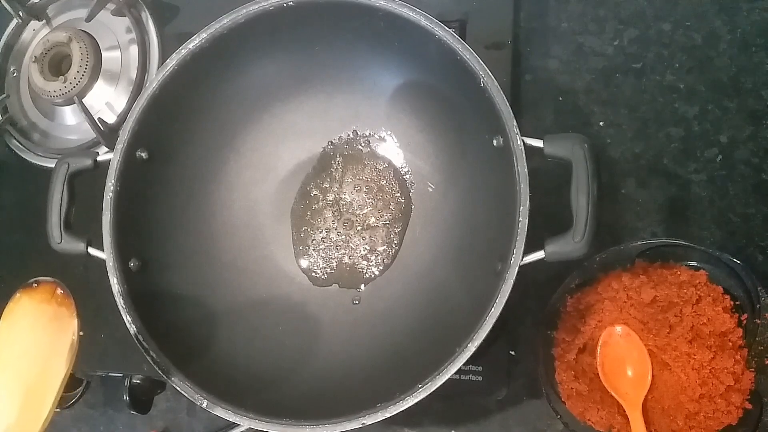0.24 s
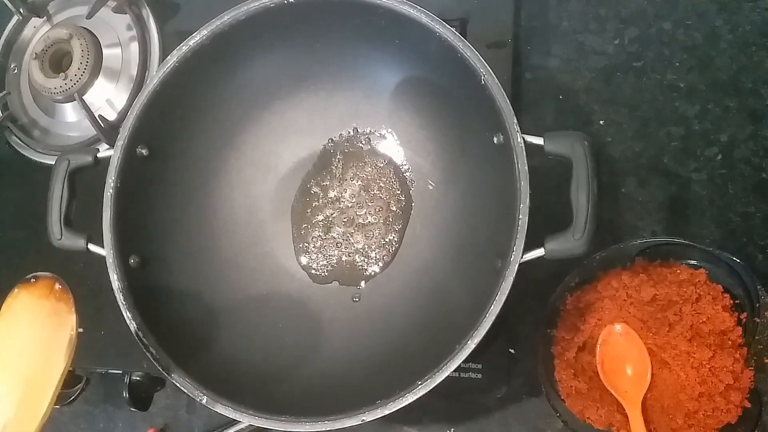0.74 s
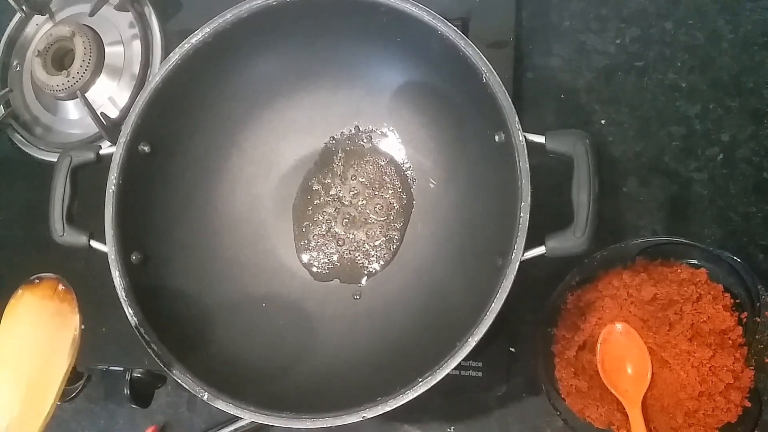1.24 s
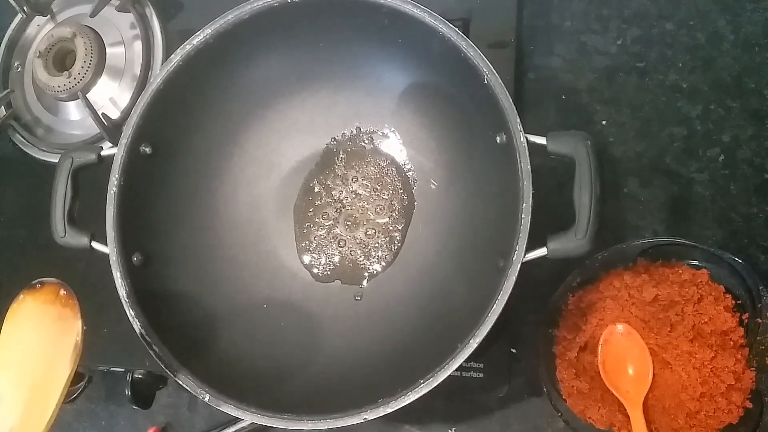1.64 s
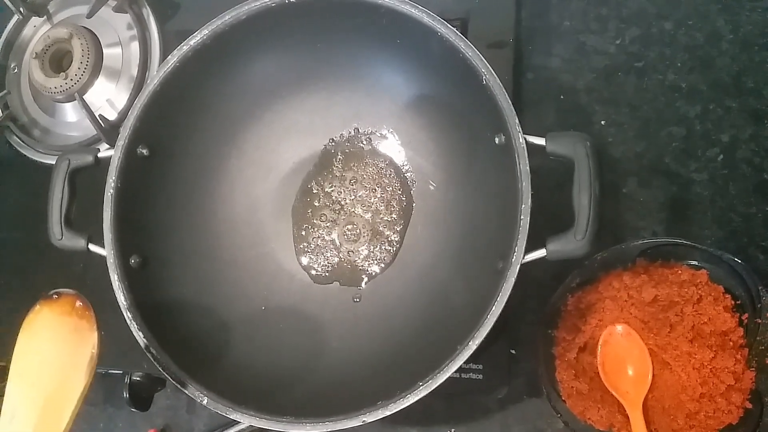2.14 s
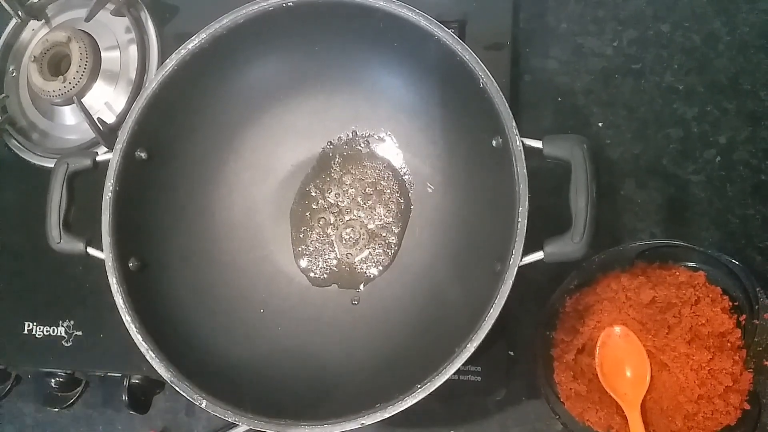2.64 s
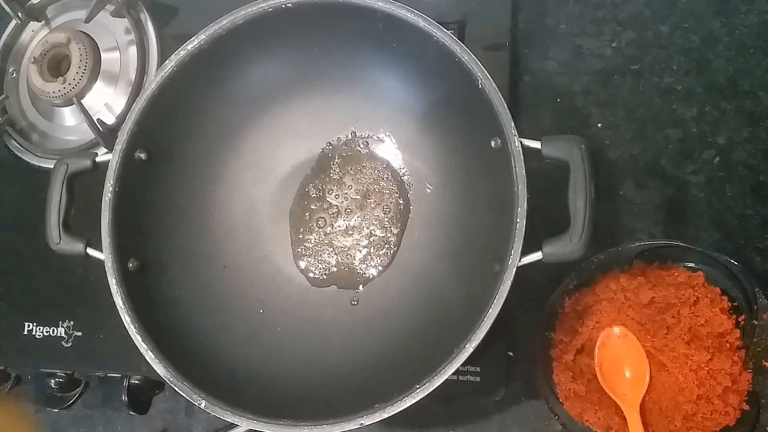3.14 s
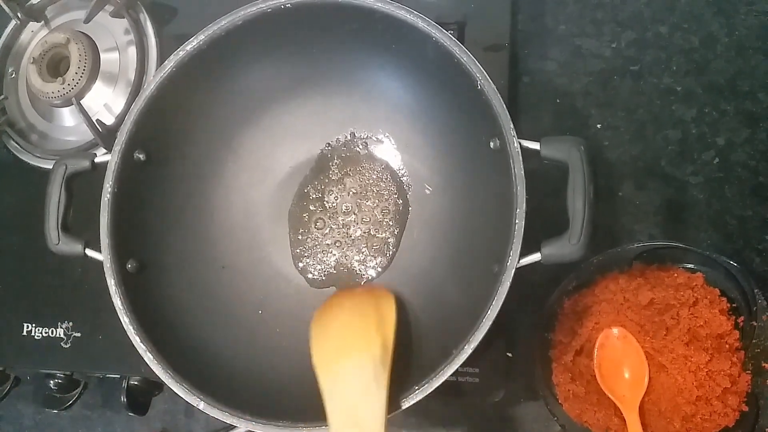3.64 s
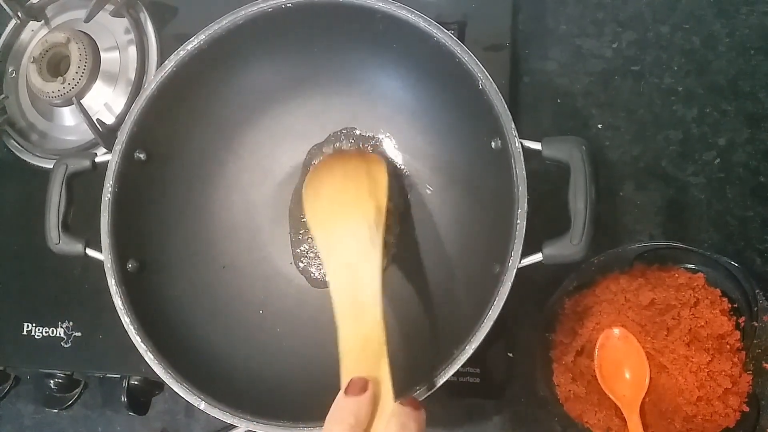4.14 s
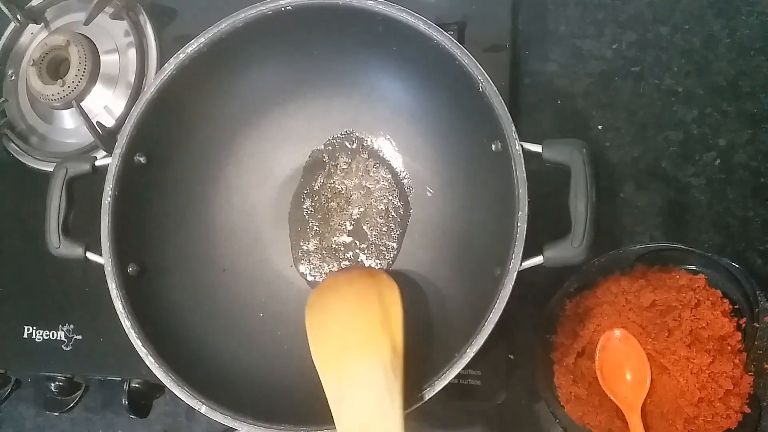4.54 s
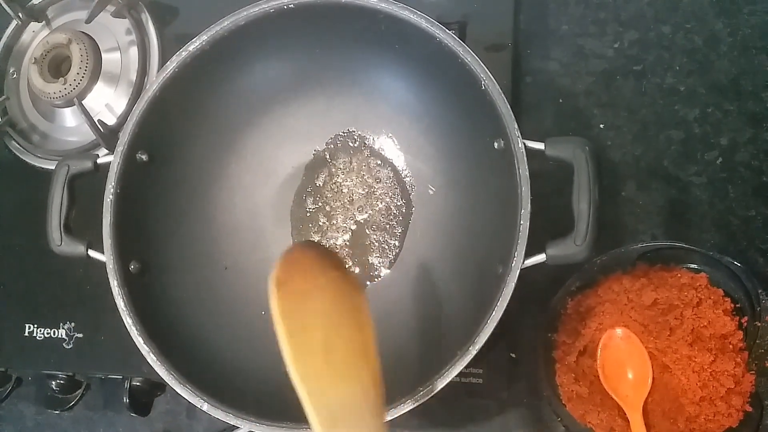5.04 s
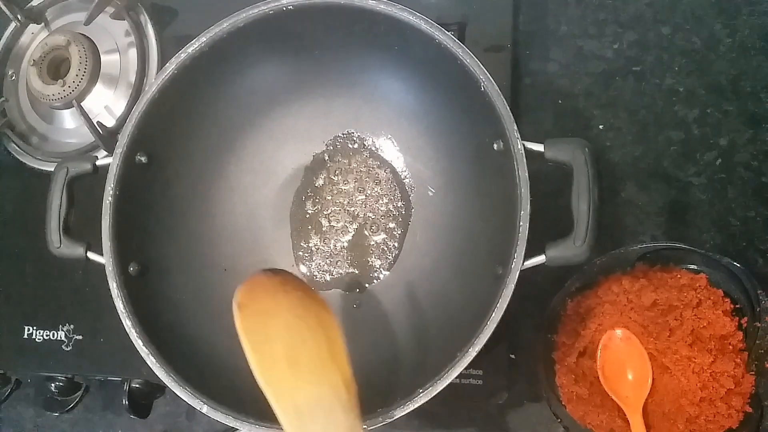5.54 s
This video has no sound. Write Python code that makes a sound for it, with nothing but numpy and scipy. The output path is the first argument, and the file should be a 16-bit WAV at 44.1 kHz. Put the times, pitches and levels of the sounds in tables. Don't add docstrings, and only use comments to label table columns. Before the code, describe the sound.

Seeds pop and crackle sharply in hot oil in a steel pan, over faint hiss and low fan hum, with a wooden spatula knocking once.

```python
import sys
import numpy as np
from scipy import signal
from scipy.fft import rfft, irfft
from scipy.io import wavfile
from scipy.ndimage import uniform_filter1d

SR = 44100
rng = np.random.default_rng(int(sys.argv[2]) if len(sys.argv) > 2 else 0)


def makeup_ratio(level_db):
    decades = np.asarray(level_db, float) / 20
    return 10 ** decades


def inscribe(sig):
    pcm = np.round(np.clip(np.atleast_2d(sig).T, -1, 1) * 32767)
    wavfile.write(sys.argv[1], SR, pcm.astype(np.int16))


N = 255339
SECONDS = np.arange(N) / SR

BURST_EDGES_HZ = [1500, 2600, 5600, 10500, 15700]


def level(x, db):
    return x * makeup_ratio(db) / np.sqrt(np.mean(x ** 2))


def unit_energy(response):
    return response / np.sqrt(np.mean(np.sum(response ** 2, axis=-1)))


def curve(table):
    s, *columns = np.transpose(table)
    return [np.interp(SECONDS, s, column) for column in columns]


def band(x, lo_hz, hi_hz):
    sos = signal.butter(2, [lo_hz, min(hi_hz, 20000)], "bandpass", fs=SR, output="sos")
    return signal.sosfilt(sos, x)


def band_both_ways(x, lo_hz, hi_hz):
    backwards = band(x, lo_hz, hi_hz)[:, ::-1]
    return band(backwards, lo_hz, hi_hz)[:, ::-1]


def top_cut(x):
    return signal.sosfilt(signal.ellip(10, .2, 80, 15850, fs=SR, output="sos"), x)


def convolve(x, response):
    return signal.fftconvolve(x, response, axes=-1)[..., :N]


def decay(t60, length_s):
    return np.exp(-np.log(1000) * np.arange(int(length_s * SR)) / SR / t60)


def room_tail(shape, t60, build_s):
    noise = rng.standard_normal((*shape, SR // 2))
    build_up = np.minimum(np.arange(SR // 2) / SR / build_s, 1)
    return noise * decay(t60, .5) * build_up


def ring(modes):
    t = np.arange(SR // 2) / SR
    out = 0
    for hz, db, t60 in modes:
        phase_turns = 0.3 * rng.random((2, 1)) + np.array([[0], [.15]])
        tone = np.sin(2 * np.pi * (hz * t + phase_turns))
        out = out + makeup_ratio(db) * decay(min(t60, .4), .5) * tone
    return unit_energy(out)


def walk(rate):
    hold = int(SR / rate)
    steps = np.repeat(rng.standard_normal(N // hold + 1), hold)
    return 1.4 * uniform_filter1d(uniform_filter1d(steps, hold), hold)[:N]


def swell(middle_s, length_s):
    return np.exp(-(2 * (SECONDS - middle_s) / length_s) ** 2)


def coloured(spectrum):
    # pitch_hz, correlation (0-1)
    likeness = [(30, 1), (120, 0.88), (300, 0.71), (1000, 0.08), (16000, 0)]
    log_hz = np.log(np.arange(1, N // 2 + 2) * SR / N)

    def across_pitch(table):
        hz, value = np.transpose(table)
        return np.interp(log_hz, np.log(hz), value)

    like = np.clip(across_pitch(likeness), 0, 1)
    mid, side = rfft(rng.standard_normal((2, N))) * makeup_ratio(across_pitch(spectrum))
    mid = mid * np.sqrt(1 + like)
    side = side * np.sqrt(1 - like)
    return irfft(np.array([mid + side, mid - side]), N)


def murmur():
    # middle_s, length_s, pitch_hz, level_db
    duct_tones = [(.1, 0.2, 290, -60), (0.394, .3, 295, -62), (.4, .3, 325, -65), (.15, .3, 370, -63),
                  (1.024, .12, 270, -61), (1.174, .2, 250, -63.5), (1.45, 0.37, 295, -64),
                  (1.5, 0.35, 208, -64), (2.1, 0.38, 300, -63), (2.2, 0.69, 245, -62),
                  (2.743, 0.21, 290, -62), (3.094, 0.17, 300, -66), (3.74, 0.14, 250, -55),
                  (4.1, .25, 290, -59), (4.505, .15, 290, -54.5), (4.78, 0.16, 250, -57),
                  (5.2, .5, 297, -58.5), (5.73, 0.12, 250, -58), (3.75, .15, 78, -53), (5.1, 1, 80, -57)]
    wander_hz = 6
    drift = wander_hz * np.cumsum(walk(15)) / SR
    flutter = makeup_ratio(2.9 * walk(20))
    out = 0
    for s, length_s, hz, db in duct_tones:
        tone = np.sin(2 * np.pi * (hz * SECONDS + drift))
        out = out + makeup_ratio(db) * swell(s, length_s) * tone
    return out * flutter * makeup_ratio(np.array([[1.5], [-1.5]]))


def fan():
    # middle_s, level_db, length_s
    throbs = [(0.12, -61, 0.13), (0.565, -61, 0.33), (1, -52.5, 0.19), (1.203, -51.5, 0.13),
              (1.386, -48.5, 0.045), (1.632, -52, 0.37), (2.05, -51.5, 0.17), (2.32, -52, 0.086),
              (2.658, -43.5, 0.062), (3.024, -66, 0.32), (3.273, -51, .04), (3.43, -51, 0.15),
              (3.71, -54, 0.17), (3.925, -52, 0.11), (4.084, -46, 0.078), (4.246, -48.5, 0.051),
              (4.363, -57, 0.058), (4.57, -46.5, 0.19), (4.783, -44.5, 0.18), (4.963, -42.5, 0.071),
              (5.096, -42.5, 0.064), (5.265, -41.5, 0.15), (5.436, -41, 0.16), (5.604, -41.5, 0.047),
              (5.705, -40, 0.062)]
    # time_s, pitch_hz
    hum_pitch = [(0, 128), (1.25, 125), (1.5, 111), (2.1, 113.3), (2.4, 123.6), (4.4, 121.1), (5.79, 123.2)]
    steady_db, wander_hz = -62.5, 6
    size = makeup_ratio(steady_db) + sum(makeup_ratio(db) * swell(s, length_s) for s, db, length_s in throbs)
    turns = np.cumsum(curve(hum_pitch)[0] + wander_hz * walk(12)) / SR
    flutter = makeup_ratio(1.0 + 1.95 * walk(25.17))
    sway = makeup_ratio(np.array([[1], [-1]]) * 1.13 * walk(9.1))
    return np.sin(2 * np.pi * turns) * size * flutter * sway


def kitchen():
    # time_s, draught_db, sizzle_db
    air = [(0.0, -63, -56.5), (0.61, -66, -62), (1.0, -66, -57), (1.79, -67, -61), (2.11, -62.5, -59),
           (3.03, -67, -58.5), (3.05, -64.5, -58), (3.66, -66.5, -57.5), (3.76, -52, -55),
           (3.87, -68, -46.5), (3.95, -65.5, -56.5), (5.01, -56.5, -56.5), (5.51, -63.5, -58.5),
           (5.79, -56, -52)]
    # pitch_hz, density_db (dB per Hz)
    rumble_spectrum = [(12, -22), (20, -9), (43, -15), (96, -1.5), (123, -3), (140, -1), (182, -7.5),
                       (279, -6.5), (387, -9.5), (456, -14), (592, -16.5), (1000, -34), (1300, -74),
                       (2200, -120)]
    # pitch_hz, density_db (dB per Hz)
    hiss_spectrum = [(290, -17), (500, -11.5), (596, -3), (1200, -7), (1700, -4.5), (2160, -5.5),
                     (2940, -10.5), (6660, -15), (8300, -12.5), (15100, -12.5), (15800, -22), (16500, -53)]
    rumble_db, follow_share = -58, 0.58
    draught_db, hiss_db = curve(air)
    rumble = level(coloured(rumble_spectrum), 0)
    deep = signal.sosfilt(signal.butter(4, 110, fs=SR, output="sos"), rumble)
    upper_db = rumble_db + follow_share * (draught_db - draught_db.mean())
    hiss = level(coloured(hiss_spectrum), 2.7) * makeup_ratio(.5 * walk(19) + .5 * walk(400))
    draught = makeup_ratio(draught_db - 6.0) * deep + makeup_ratio(upper_db + 2.5) * (rumble - deep)
    return fan() + draught + makeup_ratio(hiss_db) * hiss


def steam():
    # loudest_s, fade_s, level_db, centre_hz, width_hz
    jets = [(.113, 0.017, -43.5, 4020, 3600), (0.691, 0.029, -40, 4200, 5000),
            (1.1262, .003, -23, 4200, 3200), (1.4772, 0.004, -30, 4950, 2380),
            (4.7535, .003, -31, 5200, 1800), (2.592, .02, -41, 4500, 4400),
            (5.0797, .0012, -24, 12500, 5000), (4.1095, 0.005, -31, 11000, 1600),
            (4.5, 0.007, -33, 4050, 4020), (2.286, 0.004, -36, 8230, 2700), (1.705, .012, -50, 11000, 8000),
            (3.16, .005, -35, 9200, 2400), (2.62, 0.012, -38.5, 5840, 6000),
            (3.03, 0.021, -35, 11800, 6000), (3.487, .001, -50, 14000, 3000),
            (4.1095, 0.005, -35, 5800, 800), (4.2, 0.0031, -54, 11900, 1500),
            (4.262, .003, -49, 13500, 3000), (5.127, .003, -38, 12500, 2400),
            (5.145, .004, -37.5, 12700, 3600), (5.271, .004, -47, 11800, 3000),
            (5.728, 0.013, -40, 4630, 530), (5.752, 0.0043, -46.5, 8000, 2000)]
    swell_share = 0.36
    out = np.zeros((2, N))
    noise = rng.standard_normal((2, N)) * makeup_ratio(np.array([[3.0], [-3.0]]))
    for s, fade_s, db, hz, width in jets:
        near = slice(max(int(s * SR) - SR // 8, 0), int(s * SR) + SR // 4)
        t = SECONDS[near]
        shape = np.exp(-np.abs(t - s) / np.where(t < s, swell_share * fade_s, fade_s))
        jet = level(band(noise[:, near], hz - width / 2, hz + width / 2), 0)
        out[:, near] += makeup_ratio(db) * shape * jet
    return top_cut(out)


def spatula():
    # start_s, hold_s, rub_db, squeak_db, rasp_db
    strokes = [(1.962, 0.013, -62.5, -46, -57), (2.045, .08, -63, -62, -53.5), (3.69, 0.012, -46, -29, -45),
               (3.735, 0.1, -48, -46, -55.5), (3.763, 0.0071, -72, -39, -59),
               (3.791, 0.0054, -70, -27.5, -57), (3.799, .004, -60, -37, -57), (3.833, .012, -67, -31, -67),
               (3.858, .007, -65, -30.5, -64), (3.87, 0.013, -49, -37, -54), (4.351, 0.0084, -42, -40, -38),
               (5.156, .015, -60, -61, -61.5), (5.25, 0.13, -66, -70, -55.5)]
    # pitch_hz, half_width_hz, level_db
    wood_bands = [(588, 60, 8), (878, 127, 9), (1690, 105, -2.5), (440, 210, 9)]
    # start_s, level_db
    knock_times = [
        (3.686, -17.5),
        (4.352, -34.5),
        (3.738, -33),
        (3.808, -34),
    ]
    # pitch_hz, level_db, t60_s
    knock_modes = [(560, -6, .025), (690, 0, .025), (1650, 2, .03), (1810, 2, .025), (2130, -2, .05),
                   (2600, -4, .025), (3350, -3, .03)]
    # time_s, pitch_hz
    squeak_pitch = [(0, 2130), (3.76, 2100), (3.8, 2130), (3.86, 2220), (3.92, 2190), (4.3, 2130)]
    press_db_per_s, lift_db_per_s = 2000, 341
    wander_hz, squeak_fade = 70, 2.2

    grit = rng.standard_normal((2, N)) * makeup_ratio(0.56 * walk(300) + 3.5 * walk(60))
    grit[1] = 0.66 * grit[0] + 0.79 * grit[1]
    wood = sum(makeup_ratio(db) * band(grit, hz - width, hz + width) for hz, width, db in wood_bands)
    wood = level(wood, 0)
    turns = np.cumsum(curve(squeak_pitch)[0] + wander_hz * walk(150)) / SR
    tone = np.sin(2 * np.pi * (turns + np.array([[0], [.2]]))) * makeup_ratio(3.5 * walk(200))
    squeak = level(tone, 0) + 0.6 * level(band(grit, 1950, 2600), 0)
    rasp = level(band(grit, 1020, 4900), 0)

    out = np.zeros((2, N))
    for s, hold_s, rub_db, squeak_db, rasp_db in strokes:
        press_db = press_db_per_s * (SECONDS - s)
        lift_db = lift_db_per_s * (s + hold_s - SECONDS)
        touch = makeup_ratio(np.minimum(np.minimum(press_db, lift_db), 0))
        out += touch * makeup_ratio(rub_db + 0.5) * wood
        out += touch ** squeak_fade * makeup_ratio(squeak_db - 10.0) * squeak
        out += touch * makeup_ratio(rasp_db + 1.5) * rasp
    knocks = np.zeros((1, N))
    for s, db in knock_times:
        knocks[0, int(s * SR)] = makeup_ratio(db + 17.0)
    return out + band(convolve(knocks, ring(knock_modes)), 270, 3390)


def slaps():
    # start_s, energy_db
    slap_times = [(0.075, -23.5), (0.4712, -33.5), (0.6782, -15), (0.9054, -35), (0.9462, -27),
                  (0.9636, -20), (1.1249, -22), (1.4763, -34), (1.7348, -32.5), (1.9603, -30.5),
                  (2.3652, -26), (2.5773, -19), (2.6383, -30), (2.7045, -21.5), (3.035, -20), (3.295, -33),
                  (3.3966, -35), (3.5774, -22), (3.7147, -18.5), (4.1087, -31.5), (4.3122, -32),
                  (4.3568, -23), (4.4947, -22), (4.7533, -31), (4.764, -25), (4.8344, -19.5),
                  (5.0801, -25.5), (5.7273, -36)]
    slap_hz, lean_db = (486, 1640), 5
    room_db, room_t60_s = -3, .4
    lag = 6
    out = np.zeros((2, N))
    s, db = np.transpose(slap_times)
    for side, sign in enumerate((.5, -.5)):
        out[side, (s * SR - sign * lag).astype(int)] = -makeup_ratio(db + sign * lean_db + 15)
    out = band_both_ways(out, *slap_hz)
    room = unit_energy(room_tail((2,), room_t60_s, 0.0059))
    return out + convolve(out, makeup_ratio(room_db) * room)


def steel():
    # pitch_hz, level_db, t60_s
    families = [
        [(2116, -4, .25), (2142, -2, .22), (2130, 3, .07), (2190, -4, .12), (2225, -7, .1), (2570, -6, .08)],
        [(3145, 0, .4), (3163, -3, .3), (3300, -1, .2), (3360, -3, .1)],
        [(4058, -3, .2), (4160, -4, .12), (4290, -2, .16), (4335, -1, .16), (4470, -4, .1), (4640, -5, .1),
         (4780, -4, .1)],
    ]
    # start_s, peak_db, then low_db, middle_db, high_db against the peak
    strikes = [(0.1116, -35, -28, -20, -10), (0.6769, -22, -30.5, -23, -21), (0.9038, -47, -17, -29, -7),
               (0.9448, -33.5, -22.5, -26.5, -11), (0.9622, -28, -22.5, -13, -11),
               (1.1233, -26, -20.5, -21, -30), (1.4755, -32.5, -24, -31, -17),
               (2.7037, -27.5, -30, -18, -20), (3.2939, -35, -28, -12, -13),
               (3.4266, -33, -27.5, -30, -11.5), (3.7135, -36, -20, -26, -15),
               (3.7913, -30.5, -20, -10, -30), (4.354, -26, -22, -30, -31),
               (4.4932, -24, -22.5, -10.5, -12), (4.7516, -32, -25, -31, -4),
               (4.7626, -25, -26.5, -32, -10), (5.0055, -37, -30, -15, -12),
               (5.7264, -37.5, -25.5, -21, -21)]
    radiation_db = [39, 20, 26]
    s, peak_db, *family_db = np.transpose(strikes)
    out = 0
    for db, modes, ready_db in zip(family_db, families, radiation_db):
        hits = np.zeros((1, N))
        hits[0, (s * SR).astype(int)] = makeup_ratio(peak_db + db + ready_db)
        out = out + convolve(hits, ring(modes))
    return out


def bursts():
    # start_s, snap_db, spit_db, fizz_db
    pops = [(0.0748, -15.5, -8, -1), (0.678, -4.5, -1, 2), (0.905, -21, -16.5, -17),
            (0.9466, -11, -12, -15), (0.9633, -9.5, -6.5, -2.5), (1.1253, -3, -14, -9),
            (1.4759, -9.5, -38, -36), (1.7344, -22, -22, -17), (1.9603, -14, -13, -7.5),
            (2.0153, -31, -16.5, -10), (2.2842, -30, -19, -22.5), (2.365, -14, -16, -4),
            (2.5776, -8.5, -1, 2), (2.6381, -12.5, -11, -23), (2.704, -7, -5, -1),
            (3.035, -13, -11.5, -3.5), (3.1354, -19.5, -14.5, -23), (3.2947, -16, -25, -24),
            (3.396, -15, -11.5, -26), (3.5775, -12.5, -5, -2), (3.7147, -4, -4.5, -3),
            (4.1092, -28, -31, -24), (4.312, -18.5, -15, -12), (4.3573, -17, -16.5, -12),
            (4.495, -3.5, -10, -7.5), (4.7534, -13, -14, -17), (4.7647, -12, -18, -26),
            (4.834, -10, -11.5, -12), (5.0794, -15, -17, -2), (5.7251, -16, -25, -33)]
    # start_s, energy_db, pitch_hz
    ticks = [(0.1486, -21, 12000), (0.3115, -27.5, 8800), (0.471, -22, 6600), (1.697, -29, 12000),
             (2.111, -14.5, 6400), (2.1771, -33, 8000), (2.8894, -21, 4740), (2.9294, -24, 15000),
             (3.0226, -18, 11000), (3.1585, -19, 8200), (3.3035, -16, 14000), (3.4273, -15, 4000),
             (3.7922, -14, 2596), (4.6711, -22.5, 6900), (5.006, -23, 10500), (5.0172, -16, 7600),
             (5.5543, -34, 9000), (0.6764, -9, 5000), (0.9635, -12.5, 2000), (2.578, -10, 2200),
             (3.0348, -14, 2000), (4.8344, -2.5, 1900), (2.5705, -18, 4000), (2.6195, -14, 5000),
             (3.087, -30, 11000), (1.1249, -8, 4000), (1.476, -14, 5140), (4.7527, -17, 5400)]
    thud_db = -7
    fall_db_per_octave = 10
    lean_db, lean_per_db = 6, 0.3335
    s, snap_db, spit_db, fizz_db = np.transpose(pops)
    large = np.array([(snap_db + fizz_db) / 2 + thud_db, snap_db, spit_db, fizz_db])
    tick_s, db, hz = np.transpose(ticks)
    middle_hz = np.sqrt(np.multiply(BURST_EDGES_HZ[:-1], BURST_EDGES_HZ[1:]))[:, None]
    small = db - fall_db_per_octave * np.abs(np.log2(middle_hz / hz))
    part_db = np.hstack([large, small])
    return np.append(s, tick_s), part_db, lean_db - lean_per_db * part_db.max(axis=0)


def seeds():
    # room_t60_s, room_db, lean_share (of the left-right lean)
    parts = [
        (0.41, 3, 0.24),
        (0.4, 6, 0.019),
        (0.31, 5, 0.28),
        (0.28, -0.5, 1.66),
    ]
    # delay_s, level_db
    bowl_echoes = [(.0008, -16.5), (.0021, -23), (.0037, -17)]
    spots = 3
    s, part_db, lean_db = bursts()
    place = (s * SR).astype(int)[:, None] + np.arange(-16, 112)
    burst = rng.standard_normal((len(s), 2, 128)) * np.exp(-np.arange(128) / SR / 0.00051)
    burst = irfft(np.exp(1j * np.angle(rfft(burst))), 128)
    latest = np.searchsorted(np.sort(s) - .004, SECONDS)
    at_spot = latest % spots == np.arange(spots)[:, None, None]
    out = np.zeros((2, N))
    for db, lo_hz, hi_hz, (t60, room_db, lean) in zip(part_db, BURST_EDGES_HZ, BURST_EDGES_HZ[1:], parts):
        crack = np.zeros((2, N))
        for side, sign in enumerate((.5, -.5)):
            size = makeup_ratio(db + sign * lean * lean_db - 4.5) * np.sqrt(SR / 2 / (hi_hz - lo_hz))
            np.add.at(crack[side], place, burst[:, side] * size[:, None])
        crack = band_both_ways(crack, lo_hz, hi_hz)
        bowl = crack.copy()
        for echo_s, echo_db in bowl_echoes:
            bowl += makeup_ratio(echo_db) * np.roll(crack, int(echo_s * SR), axis=1)
        room = room_tail((spots, 2), t60, 0.0017)
        room *= 1 + 1.52 * decay(0.033, .5)
        reflected = convolve(crack.mean(axis=0) * at_spot, makeup_ratio(room_db) * unit_energy(room))
        out += bowl + top_cut(reflected.sum(axis=0))
    out[1] = np.roll(out[1], 3)
    return out


def scene():
    background = murmur() + top_cut(kitchen())
    return background + steam() + spatula() + slaps() + steel() + seeds()


def roll_off(x):
    return signal.sosfilt(signal.butter(12, 16970, fs=SR, output="sos"), x)


def record(dry):
    lift = makeup_ratio(-6.0) * band(dry[0], 7500, 10730)
    ports = dry + np.array([lift, 0 * lift])
    rounded = np.tanh(1.603 * ports) / 1.597
    top = signal.ellip(8, .2, 70, 16900, fs=SR, output="sos")
    return roll_off(signal.sosfilt(top, rounded))


dry = scene()
out = record(dry)
inscribe(out)
```